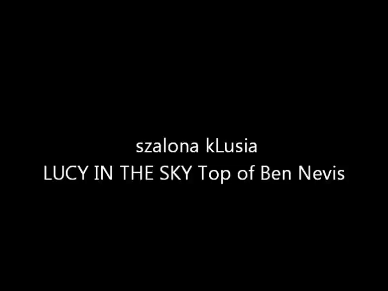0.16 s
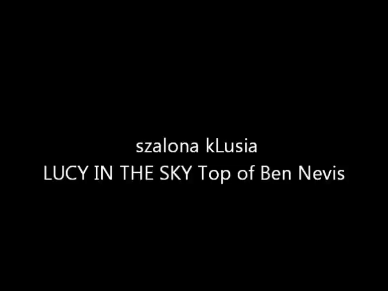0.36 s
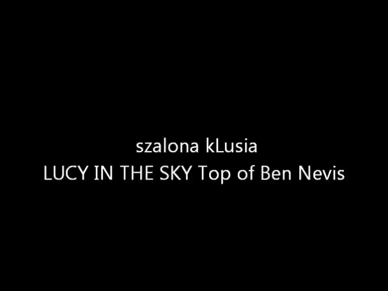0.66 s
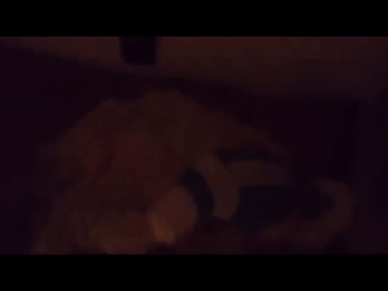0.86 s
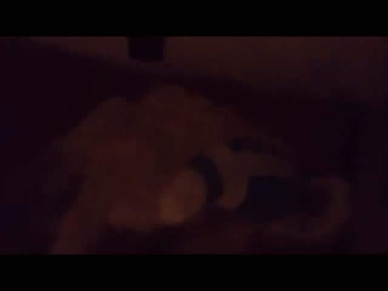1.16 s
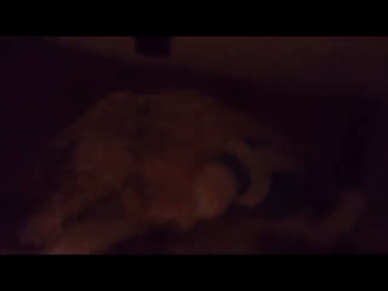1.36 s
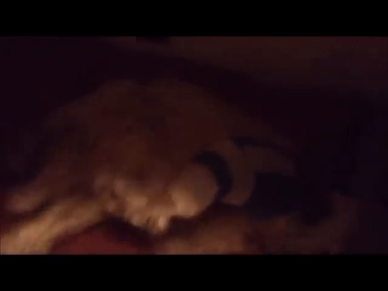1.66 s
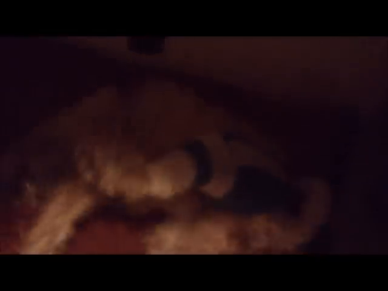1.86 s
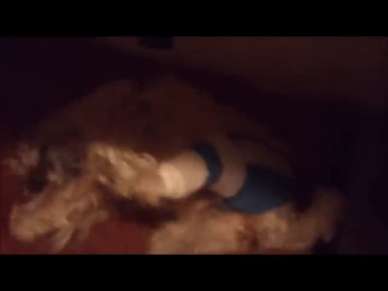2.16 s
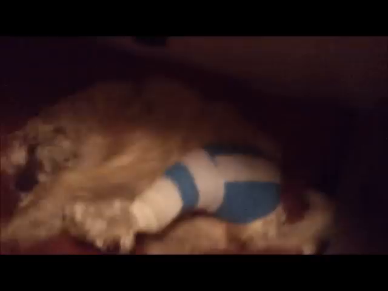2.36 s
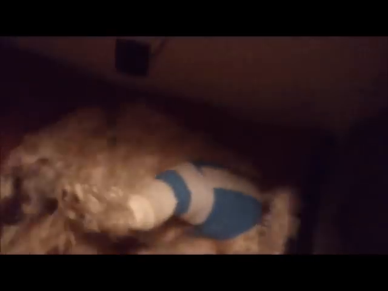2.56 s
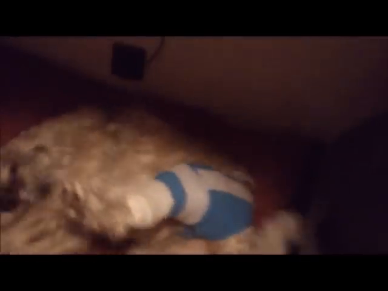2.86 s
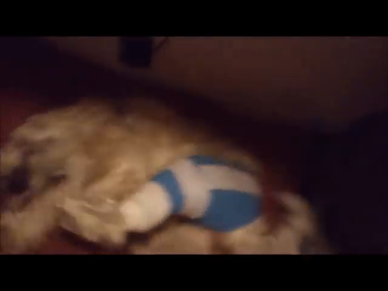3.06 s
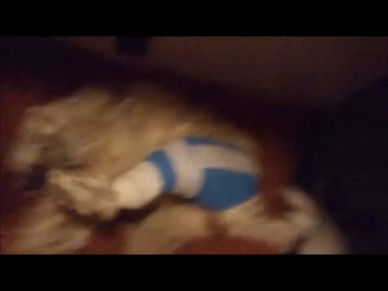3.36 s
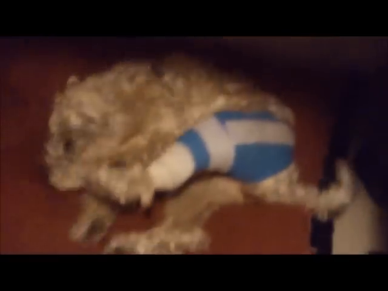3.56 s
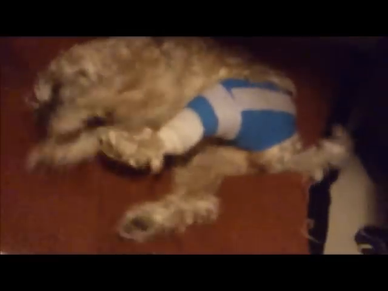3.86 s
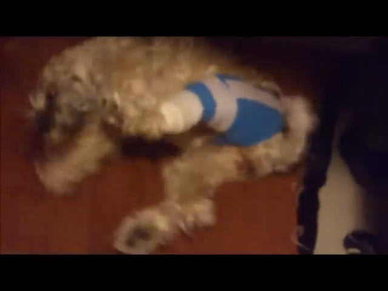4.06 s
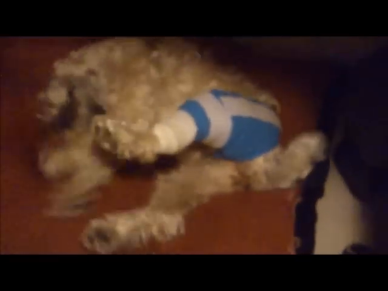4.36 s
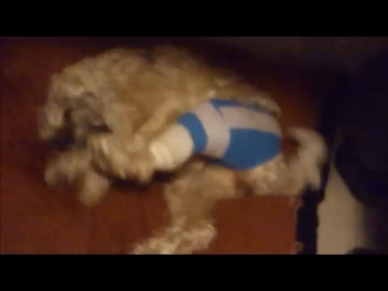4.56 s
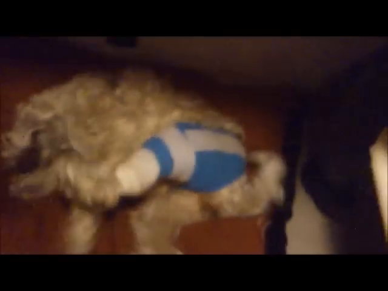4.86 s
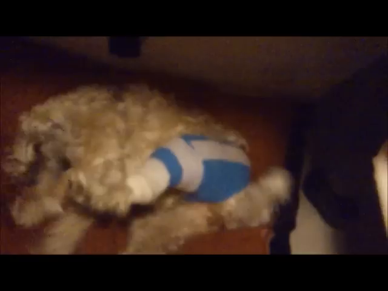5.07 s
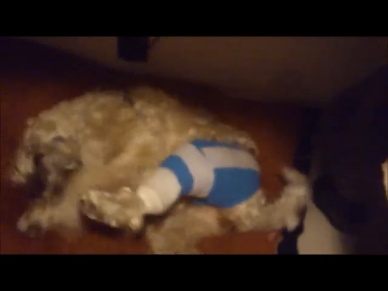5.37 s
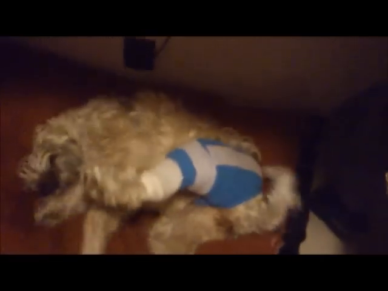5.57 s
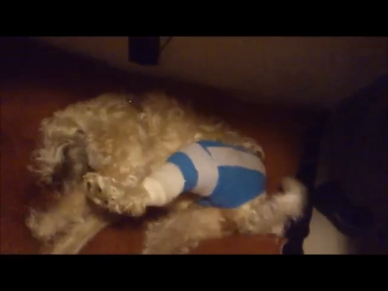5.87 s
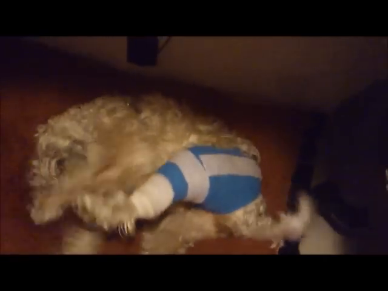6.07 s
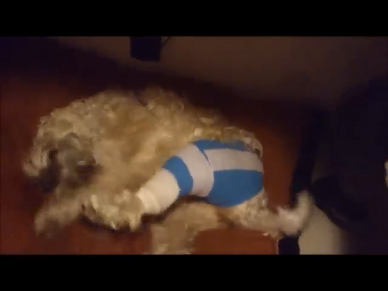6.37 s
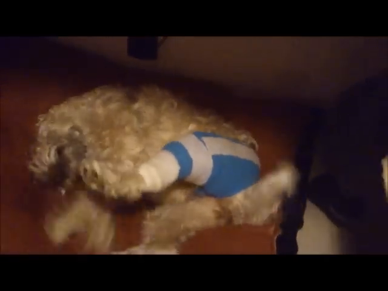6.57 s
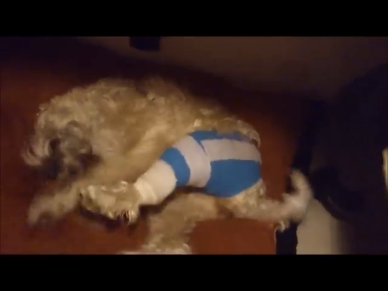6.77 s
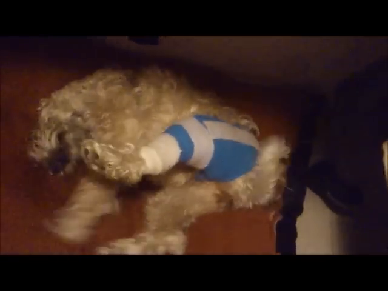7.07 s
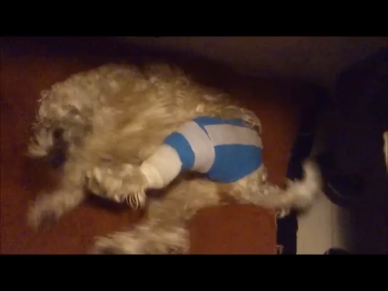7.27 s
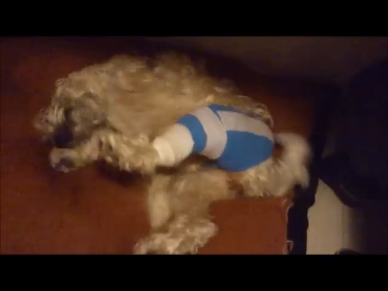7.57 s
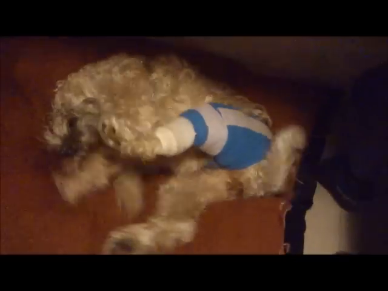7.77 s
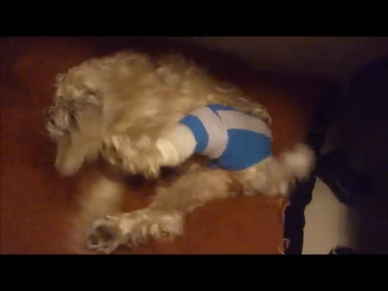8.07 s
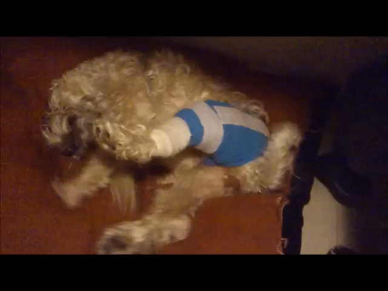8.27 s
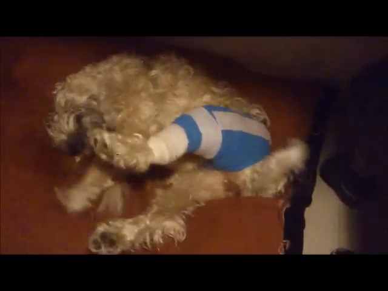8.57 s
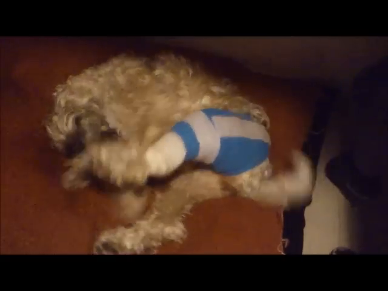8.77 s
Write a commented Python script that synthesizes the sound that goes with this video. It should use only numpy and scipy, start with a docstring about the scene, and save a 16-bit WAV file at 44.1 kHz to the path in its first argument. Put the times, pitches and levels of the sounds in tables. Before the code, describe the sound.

A small dog lies on an upholstered seat, tail thumping the hollow padded frame while paws rustle over fabric and claws tick sharply.

```python
"""A small dog lies on an upholstered seat and wags. First come short strokes of paws and fur over fabric,
shaped noise that goes on throughout, and the first claw tick, a brief ping. Then the tail thumps the hollow
padded frame about three times a second: dents that ring its modes, each with a rough puff of fur.
Between thumps the tail scrapes the cover and the body shoves the padding, a soft push into the boom.
Soon the dog puffs through its nose, resonant noise, and its claws scuff and later rake, dying noise bursts."""
import sys
import numpy as np
from scipy import signal
from scipy.io import wavfile

SR = 44100
rng = np.random.default_rng(int(sys.argv[2]) if len(sys.argv) > 2 else 0)


def inscribe(sig):
    """Save sig as 16-bit PCM at rate SR to the path in sys.argv[1].

    A 1-D sig is mono; a 2-D sig holds one channel per row.
    Samples are clipped to [-1, 1] before scaling.
    """
    pcm = np.round(np.clip(np.atleast_2d(sig).T, -1, 1) * 32767)
    wavfile.write(sys.argv[1], SR, pcm.astype(np.int16))


N = 393372   # samples


def from_db(db):
    """Decibels to gain."""
    return 10 ** (np.asarray(db) / 20)


def rms_one(x):
    """Scale to unit rms."""
    return x / np.sqrt(np.mean(x ** 2) + 1e-20)


def band_pass(x, low_hz, high_hz):
    """Keep what lies between two edges."""
    return signal.sosfilt(signal.butter(2, [low_hz, high_hz], "band", fs=SR, output="sos"), x)


def drift(rate_hz):
    """Slow random wander of rms 1: noise at every 40th sample through a double one-pole."""
    r = np.exp(-2 * np.pi * rate_hz * 40 / SR)
    noise = rng.standard_normal(N // 40 + 2002)
    slow = signal.lfilter([1], [1, -2 * r, r * r], noise)[2000:]   # drop the filter's settling
    return np.interp(np.arange(N) / 40, np.arange(len(slow)), rms_one(slow))


def clicks(times, gains):
    """A train of single-sample impulses."""
    out = np.full(N, 1e-18)   # a tiny floor keeps the filters fast
    np.add.at(out, (np.asarray(times) * SR).astype(int), gains)
    return out


def ring(x, hz, t60):
    """A two-pole resonator: a unit click sets a dying sine of height 1 ringing."""
    r = from_db(-60 / (t60 * SR))
    w = 2 * np.pi * hz / SR
    return signal.lfilter([0, np.sin(w)], [1, -2 * r * np.cos(w), r * r], x)


def contact(x, width_s):
    """A soft blow: each click is spread over a smooth push of unit area."""
    push = np.hanning(int(width_s * SR) + 2)
    return signal.lfilter(push / push.sum(), 1, x)


def resonances(x, modes):
    """Broad resonances side by side, of alternating sign; rms 1."""
    out = 0
    for k, (hz, width_hz, db) in enumerate(modes):
        peak = signal.lfilter(*signal.iirpeak(hz, hz / width_hz, fs=SR), x)
        out = out + from_db(db) * peak * (-1) ** k
    return rms_one(out)


def bursts(noise, s, db, t60):
    """Noise that starts within a millisecond and dies away."""
    t = np.maximum(np.arange(N) / SR - s, 0)
    attack = np.minimum(t / .001, 1)
    return noise * from_db(db - 60 * t / t60) * attack


def friction(spectrum, grain_db, patchy_db, flicker_hz):
    """Fibres slipping: uneven grains in about third-octave bands, each band flickering; rms 1."""
    hz, level = np.transpose(spectrum)
    edges = np.geomspace(hz[0], hz[-1], int(3 * np.log2(hz[-1] / hz[0])) + 2)
    grains = rng.standard_normal((2, N)) * from_db(grain_db * drift(170))
    together = drift(flicker_hz)   # the part of the flicker that all bands share
    out = 0
    for k, (low, high) in enumerate(zip(edges, edges[1:])):
        band = band_pass(grains[k % 2], low, high)
        band_db = np.interp(np.log(low * high) / 2, np.log(hz), level)
        out = out + band * from_db(band_db + patchy_db * (together + drift(flicker_hz)))
    return rms_one(out)


# strokes of fur and paws on fabric, about two a wag: peak t/s, fade time/s, peak rub level/dB,
# peak fibre hiss level/dB
FABRIC_STROKES = [(0.876, 0.049, -37.5, -47), (1.057, 0.099, -44.0, -51.5), (1.197, 0.066, -43, -54.5),
                  (1.392, 0.073, -44, -50.5), (1.589, 0.087, -44.5, -47), (1.764, 0.078, -45, -49.5),
                  (1.93, 0.076, -40.5, -52.5), (2.194, 0.13, -49.0, -54.5), (2.353, 0.06, -45.5, -55),
                  (2.539, 0.095, -47, -52.5), (2.689, 0.096, -41.5, -51.5), (2.976, 0.17, -44.5, -54),
                  (3.076, 0.072, -42, -52), (3.257, 0.095, -51, -54), (3.463, 0.045, -44.5, -58),
                  (3.655, 0.023, -68, -64), (3.865, 0.031, -54.5, -54), (4.015, 0.11, -50, -55),
                  (4.174, 0.07, -44, -51.5), (4.393, 0.1, -48.0, -51.5), (4.542, 0.081, -42, -51),
                  (4.73, 0.097, -53, -54.5), (4.901, 0.11, -43, -55), (5.133, 0.06, -48, -51),
                  (5.28, 0.097, -42.5, -51.5), (5.493, 0.076, -50, -52), (5.609, 0.054, -38, -50),
                  (5.81, 0.22, -53, -56.5), (5.958, 0.041, -41, -54.5), (6.159, 0.074, -62, -59),
                  (6.327, 0.096, -46.5, -56.5), (6.567, 0.07, -54.5, -55), (6.732, 0.098, -46, -56),
                  (6.945, 0.093, -54.5, -55.5), (7.113, 0.1, -45, -57.5), (7.367, 0.086, -52.5, -53.5),
                  (7.524, 0.12, -45.5, -55), (7.731, 0.079, -50, -54), (7.893, 0.07, -44, -52.5),
                  (8.126, 0.082, -54, -53.5), (8.274, 0.065, -42.5, -55), (8.534, 0.083, -51, -53.5),
                  (8.684, 0.065, -45.5, -55.0)]
RISE_SHARE = 0.76   # a stroke swells in this share of the time it takes to fade


def stroke_db(peak_db, rest_db):
    """Bell-shaped swells, one per stroke, whose power adds to a resting level."""
    t = np.arange(0, N, 32) / SR
    power = from_db(2 * rest_db)
    for (s, fade_s, *_), db in zip(FABRIC_STROKES, peak_db):
        u = (t - s) / np.where(t < s, RISE_SHARE * fade_s, fade_s)
        power = power + from_db(2 * db) * np.exp(-2 * u ** 2)
    return np.interp(np.arange(N) / SR, t, 10 * np.log10(power))


# knock modes of the hollow frame, as a blow rings them: f/Hz, level/dB, t60/s
KNOCK_MODES = [(232.4, -13.5, 0.14), (390, -30, 0.05), (442, 0.5, 0.039), (640, -16, 0.093),
               (822, -3.5, 0.037), (996, -14, 0.084), (1370, -30, 0.11)]


def catches(per_s, size_db):
    """Fur catching on the weave: random small tugs that knock the frame, evened and damped; rms 1."""
    size = from_db(size_db * np.minimum(rng.exponential(1, N), 4))
    tugs = (rng.random(N) < per_s / SR) * size * rng.choice([-1, 1], N)
    dealt = rng.integers(0, len(KNOCK_MODES), N)   # each tug rings one mode
    out = 0
    for k, (hz, db, t60) in enumerate(KNOCK_MODES):
        out = out + from_db(db / 2) * ring(tugs * (dealt == k) + 1e-18, hz, t60 / 2)
    return rms_one(out)


# spectrum of the frame rumble: f/Hz, relative level/dB per Hz
RUMBLE_SPECTRUM = [(15, -51), (25, -1.5), (81, 3.5), (108, -4.5), (157, -15), (200, -10.5), (260, -12),
                   (440, -120)]
# spectrum of the rub: f/Hz, relative level/dB per Hz
RUB_SPECTRUM = [(88, 2), (150, -11.5), (226, -0.5), (334, -9.5), (423, -3), (548, -17.5), (827, -10.5),
                (908, -16), (1060, -13.5), (2500, -35.5), (3250, -37), (5500, -120)]
# spectrum of the fibre hiss: f/Hz, relative level/dB per Hz
HISS_SPECTRUM = [(880, -2), (1500, -7), (1800, -3.5), (2570, -9.5), (3200, -8), (3680, -6.5), (6390, -12.5),
                 (8000, -16.5), (10400, -37), (17600, -120)]
# spectrum of the sheen of the weave: f/Hz, relative level/dB per Hz
SHEEN_SPECTRUM = [(3820, -16), (6500, -21), (8150, 6), (10700, -4), (15100, -1.5), (16000, -16),
                  (16500, -27)]
# slow levels: t/s, rumble level over RUMBLE_DB/dB, sheen level before the swings of hiss and rub/dB,
# lowest frame mode level over the rub/dB
SLOW_LEVELS = [(.8, 3, -65.5, -8), (1.3, 2, -67.5, -3.5), (1.6, -1, -65, -6), (2, -1, -63.5, -4),
               (2.7, -3, -66, -7), (3.1, 1.5, -58.5, -10), (3.4, -11, -68, -17), (3.7, -4, -65.5, -24),
               (4.0, -7, -66.5, -14), (4.6, 3.5, -65, -8), (5.4, 0.5, -65, -11), (6, -3, -66.5, -21),
               (6.6, -1.5, -65.5, -9), (7.3, -0.5, -63.5, -9.5), (7.9, -4.5, -66, -7),
               (8.401, 4, -66.5, -11), (8.92, -8, -58.5, -17)]
REST_RUB_DB, REST_HISS_DB = -58, -62.5   # what is left between strokes
RUMBLE_DB, RUMBLE_FOLLOWS = -50, 0.12   # level at a middling rub; share of the rub's swing
# sheen rises with the hiss and is lower where the rub is louder (shares of swing)
SHEEN_HISS_SHARE, SHEEN_RUB_SHARE = 1, 0.43


def strokes():
    """Four ranges of the same rubbing, from frame rumble to the sheen of the weave."""
    peaks = np.transpose(FABRIC_STROKES)
    rub_db = stroke_db(peaks[2], REST_RUB_DB)
    hiss_db = stroke_db(peaks[3], REST_HISS_DB)
    rub_swing = rub_db - rub_db.mean()
    hiss_swing = hiss_db - hiss_db.mean()
    s, *slow = np.transpose(SLOW_LEVELS)
    lean_db, shine_db, hum_db = [np.interp(np.arange(N) / SR, s, db) for db in slow]
    rumble_gain = from_db(RUMBLE_DB + lean_db + RUMBLE_FOLLOWS * rub_swing)
    sheen_gain = from_db(shine_db + SHEEN_HISS_SHARE * hiss_swing - SHEEN_RUB_SHARE * rub_swing)

    slip = friction(RUB_SPECTRUM, grain_db=1.5, patchy_db=1.2, flicker_hz=25)
    rub = rms_one(slip + .65 * catches(per_s=350, size_db=4))
    # the rub sets the lowest frame mode humming
    hum = rms_one(ring(rng.standard_normal(N), KNOCK_MODES[0][0], t60=0.07))
    rumble = friction(RUMBLE_SPECTRUM, grain_db=2.5, patchy_db=1.0, flicker_hz=16)
    hiss = friction(HISS_SPECTRUM, grain_db=0.5, patchy_db=1.63, flicker_hz=13.2)
    sheen = friction(SHEEN_SPECTRUM, grain_db=2.0, patchy_db=3.0, flicker_hz=7.4)
    return (rumble_gain * rumble + from_db(rub_db) * (rub + from_db(hum_db) * hum)
            + from_db(hiss_db) * hiss + sheen_gain * sheen)


# claw and lip ticks: t/s, peak level/dB, f/Hz, t60 of each resonance pass/cycles
TICK_EVENTS = [(0.903, -22, 8550, 1.3), (1.258, -33, 6000, 0.89), (1.484, -50, 7500, 6),
               (1.978, -30.5, 8000, 3), (2.601, -30, 8000, 1.5), (3.068, -40, 12500, 6),
               (3.155, -34, 12800, 5), (3.223, -37, 12960, 4.5), (3.317, -41, 6000, 3.5),
               (3.569, -47, 4150, 7.3), (3.6367, -20.5, 4900, 2.1), (3.6372, -26, 418, 1.05),
               (4.6639, -22, 5000, 3.6), (4.664, -26.5, 447, 0.89), (4.741, -42, 9000, 6),
               (5.466, -25, 10100, 2.8), (5.790, -38, 6000, 2.7), (6.556, -25, 9900, 2.4),
               (6.948, -28, 8600, 4), (7.353, -24, 9100, 3.9), (8.124, -32, 10500, 3),
               (8.5193, -25, 8200, 5), (8.5480, -30.5, 5140, 6), (8.5530, -28.5, 4050, 13),
               (8.809, -28.5, 5200, 3.1), (8.8100, -39.5, 3430, 9.4), (8.905, -34, 8500, 2.9)]


def ticks():
    """A click through one resonance twice: a rounded ping a few cycles long."""
    out = np.zeros(N)
    for s, db, hz, cycles in TICK_EVENTS:
        once = ring(clicks([s], 1.), hz, cycles / hz)
        twice = ring(once, hz, cycles / hz)
        out += from_db(db) * twice / np.abs(twice).max()
    return out


ROOM_T60_S, WALL_CUT_HZ = 0.4, 610


def room(x):
    """Ten feedback delays, duller on every round, stepped block by block."""
    out = np.zeros(N)
    dull = np.exp(-2 * np.pi * WALL_CUT_HZ / SR)
    for k, lag in enumerate((np.geomspace(.009, .031, 10) * SR).astype(int)):
        loop, state = x.copy(), [0.]
        gain = from_db(-60 * lag / SR / ROOM_T60_S)
        for i in range(lag, N, lag):
            back, state = signal.lfilter([gain * (1 - dull)], [1, -dull], loop[i - lag:i], zi=state)
            loop[i:i + lag] += back[:N - i]
        out += (loop - x) * (-1) ** k   # echoes only, without the direct sound
    return out


# tail on the frame: t/s, blow level/dB, boom level over the blow/dB, knock level over the blow/dB
THUMP_EVENTS = [(1.0121, -36.5, -16, 4), (1.0774, -34.5, -14, 9.5), (1.1755, -13.5, -9.5, -10),
                (1.5457, -14.5, -9, -13.5), (1.8828, -19.5, -7.5, -13), (2.236, -24, -6, -5.5),
                (2.632, -23, -0.5, 0), (2.711, -35, -5, -3), (3.009, -17, -7, -7.5), (3.422, -29, -6, -4),
                (3.446, -29, -7, 3.5), (4.4086, -37, -5, -1), (4.492, -32, 4.5, 5), (4.5058, -24, -7, 2),
                (4.578, -38.5, -20, 7.5), (4.856, -28, -2, -10), (4.8659, -18.5, -8.5, -6),
                (5.216, -30.5, -3, 0), (5.2238, -22, -0.5, 2.5), (5.5746, -20.5, -2, -2),
                (5.924, -21.5, -11, -11), (5.9411, -15.5, -8.5, -10), (6.2841, -25, -4, 2),
                (6.6918, -42, 4, -10), (7.0744, -27, -1, -3), (7.0852, -16, -8.5, -6),
                (7.483, -32.5, -9, -11), (7.5757, -37.5, 3.5, -18), (7.833, -34.5, 0, 1),
                (7.8437, -24.5, 0.5, 4), (7.9921, -39.5, 9, 6.5), (8.2329, -37, -2, 6),
                (8.241, -20, -2, -1.5), (8.6552, -20.5, -4, -4.5)]
# boom modes of the hollow frame: f/Hz, level/dB, t60/s
BOOM_MODES = [(80.5, -3.5, 0.18), (95.8, -10, 0.23)]


def thumps():
    """The cover dents inward (a short negative pulse), the knock swings in and the boom swings out."""
    s, blow_db, boom_db, knock_db = np.transpose(THUMP_EVENTS)
    scatter_db = rng.normal(0, 3.5, (len(s), len(KNOCK_MODES)))   # each blow lands a little elsewhere
    rebound = s + .001   # the boom starts as the dent springs back
    out = 0
    for hz, db, t60 in BOOM_MODES:
        out = out + ring(clicks(rebound, from_db(blow_db + boom_db + db)), hz, t60)
    hard = np.clip((blow_db + 32) / 12, 0, 1)   # strong blows meet the frame, weak ones sink in padding
    for share, width_s in ((hard, .0007), (1 - hard, .0015)):
        dent = from_db(23.0) * contact(clicks(s, share * from_db(blow_db)), 0.0008)
        knock = 0
        for k, (hz, db, t60) in enumerate(KNOCK_MODES):
            mode_gain = share * from_db(blow_db + knock_db + db + scatter_db[:, k])
            knock = knock + ring(clicks(s, mode_gain), hz, t60)
        out = out - contact(dent + knock, width_s)
    return out


SLAP_DB, SLAP_T60_S = -26.5, 0.057   # level over the blow or push
SLAP_LOW_HZ, SLAP_HIGH_HZ = 400, 2170


def slaps():
    """Every thump and shove also crushes fur: a short rough puff."""
    s, blow_db = np.transpose([row[:2] for row in THUMP_EVENTS + SHOVE_EVENTS])
    decay = from_db(-60 / (SLAP_T60_S * SR))
    dying = signal.lfilter([1], [1, -decay], clicks(s, from_db(blow_db + SLAP_DB)))
    rough = band_pass(rng.standard_normal(N), SLAP_LOW_HZ, SLAP_HIGH_HZ)
    return dying * rms_one(rough)


# after a thump the tail drags on the cover and lifts off: lift t/s, rms level at the lift/dB
DRAG_EVENTS = [(1.25, -54), (1.99, -50), (2.395, -49), (4.61, -53), (4.98, -55.5), (5.36, -54),
               (5.671, -59), (6.02, -52), (6.408, -52), (6.798, -53), (7.185, -52.5), (7.958, -50),
               (8.365, -54), (8.768, -53)]
DRAG_LOW_HZ, DRAG_HIGH_HZ = 620, 1500
DRAG_GROW_DB_PER_S, DRAG_STOP_DB_PER_S = 105, 900


def drags():
    """Gritty mid-range scrape that grows until the lift, then stops short."""
    t = np.arange(N) / SR
    grit = rng.standard_normal(N) * from_db(3 * drift(150))
    scrape = rms_one(band_pass(grit, DRAG_LOW_HZ, DRAG_HIGH_HZ))
    gain = 0
    for s, db in DRAG_EVENTS:
        swell_db = np.minimum(DRAG_GROW_DB_PER_S * (t - s), DRAG_STOP_DB_PER_S * (s - t))
        gain = gain + from_db(db + swell_db)
    return scrape * gain


# body shoving the padding: t/s, push level/dB
SHOVE_EVENTS = [(1.305, -34), (1.467, -25), (1.822, -30.5), (2.2, -42), (2.386, -36), (2.581, -33),
                (2.771, -34), (2.96, -27), (3.847, -36), (4.036, -30), (4.138, -52), (4.604, -46),
                (5.001, -32.5), (5.343, -31), (5.7, -29.5), (6.13, -42), (6.432, -38.5), (6.62, -38),
                (6.817, -33), (7.214, -31), (7.406, -37), (7.796, -32), (8.177, -33.5)]


def shoves():
    """A broad slow push reaches only the boom of the frame."""
    s, push_db = np.transpose(SHOVE_EVENTS)
    push = contact(clicks(s, from_db(push_db)), 0.0038)
    return sum(from_db(db) * ring(push, hz, t60) for hz, db, t60 in BOOM_MODES)


# the dog's breath: t/s, length/s, rms level at the crest/dB
PUFF_EVENTS = [(1.535, 0.13, -44.5), (3.01, 0.097, -51), (5.47, 0.15, -62), (5.58, 0.12, -54.5),
               (7.36, 0.22, -59), (8.66, 0.29, -63)]
# resonances of its nose: f/Hz, width/Hz, relative level/dB
NOSE_MODES = [(1630, 200, 3), (3270, 150, -0.5), (5800, 720, -10.5), (7140, 170, -2), (8200, 720, -5.5)]


def breath():
    """Air through the nostrils: smooth noise in the nose resonances, swelling and fading."""
    t = np.arange(N) / SR
    swell = 0
    for s, length_s, db in PUFF_EVENTS:
        phase = np.clip((t - s) / length_s, 0, 1)
        swell = swell + from_db(db) * np.sin(np.pi * phase) ** 0.72
    return swell * resonances(rng.standard_normal(N), NOSE_MODES)


# claw scuffs across the weave: t/s, rms level at the start/dB, low edge f/Hz, high edge f/Hz, t60/s
SCUFF_EVENTS = [(1.7848, -31.5, 746, 2300, 0.073), (1.913, -37, 750, 2340, 0.056),
                (6.68, -47, 500, 1670, 0.17), (3.637, -39.5, 250, 1480, 0.048),
                (4.664, -33.5, 250, 1500, 0.032), (7.477, -47, 300, 1940, .15),
                (7.597, -45.5, 298, 2340, 0.06), (7.991, -42, 300, 1410, 0.082),
                (8.395, -44.5, 200, 1100, 0.077), (8.549, -38.5, 295, 1930, 0.052)]


def scuffs():
    """Claws dragging over the weave: dull bands of noise that start at once and die away."""
    white = rng.standard_normal(N)
    out = np.zeros(N)
    for s, db, low_hz, high_hz, t60 in SCUFF_EVENTS:
        out += bursts(rms_one(band_pass(white, low_hz, high_hz)), s, db, t60)
    return out


# a claw rakes something hard: t/s, rms level of the ring at the start/dB, t60/s
RAKE_EVENTS = [(3.8117, -29, 0.15), (5.326, -37, 0.12)]
# what it rings with: f/Hz, width/Hz, relative level/dB
RAKED_MODES = [(457, 1100, -3), (850, 510, 3.5), (1570, 520, -5.5), (2600, 680, 2.5), (4900, 290, -0.5),
               (6000, 200, -2), (7260, 470, -10.5)]


def rakes():
    """Noise rings a hard surface; its bright bare edge dies slightly sooner than the ring."""
    white = rng.standard_normal(N)
    hard = resonances(white, RAKED_MODES)
    out = np.zeros(N)
    for s, db, t60 in RAKE_EVENTS:
        out += bursts(hard, s, db, t60) + bursts(white, s, db - 8.0, 0.97 * t60)
    return out


ROOM_DB = -22.5   # room send


def scene():
    """Blows and claws with their room, over the rubbing, the scrapes and the breath."""
    blows = ticks() + thumps() + shoves() + scuffs() + rakes()
    wet = from_db(ROOM_DB) * room(blows)
    return (strokes() + blows + wet + slaps() + drags() + breath())[None]


START_S, CUTOFF_HZ = 0.8150, 16300


def record(dry):
    """Silence, a quick fade-in as the sound starts, and a steep top cut."""
    fade = np.clip((np.arange(N) / SR - START_S) / 0.0021, 0, 1)
    return signal.sosfilt(signal.cheby2(12, 70, CUTOFF_HZ, fs=SR, output="sos"), dry * fade)


dry = scene()
out = record(dry)
inscribe(out)
```